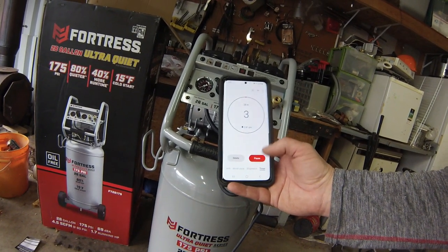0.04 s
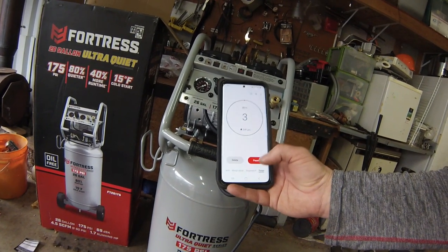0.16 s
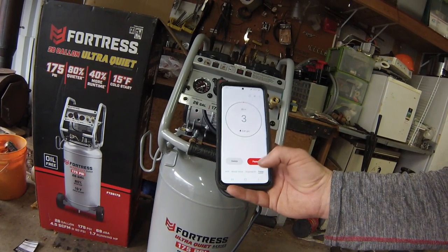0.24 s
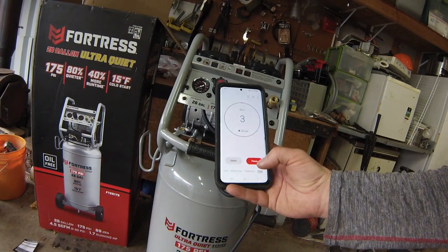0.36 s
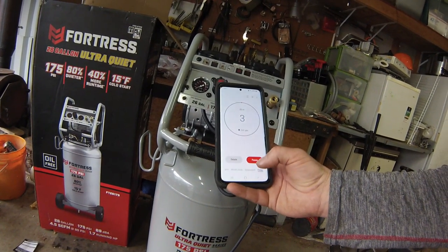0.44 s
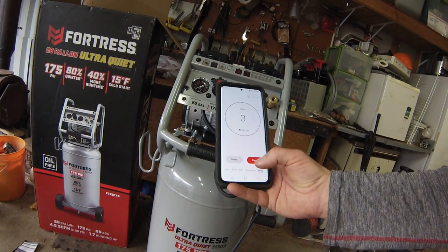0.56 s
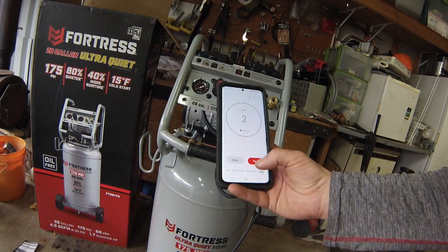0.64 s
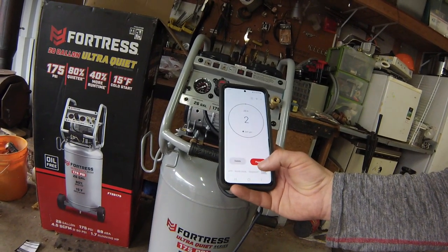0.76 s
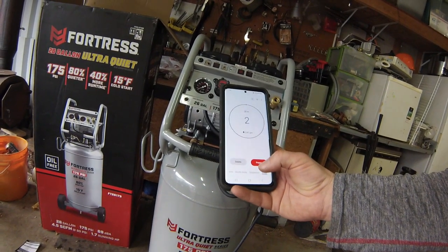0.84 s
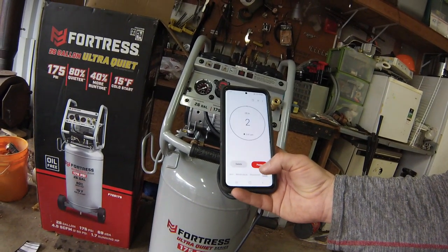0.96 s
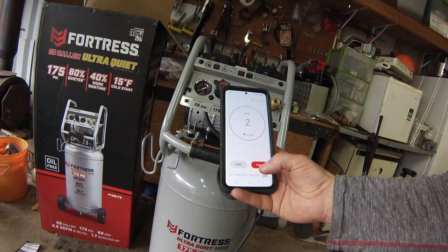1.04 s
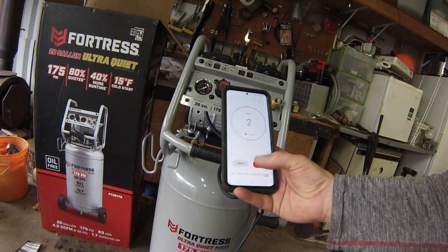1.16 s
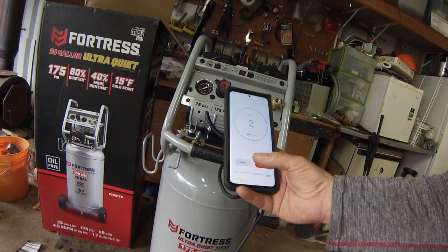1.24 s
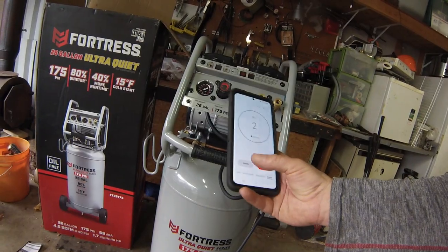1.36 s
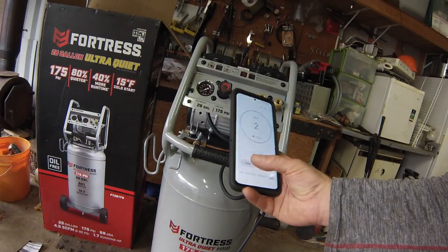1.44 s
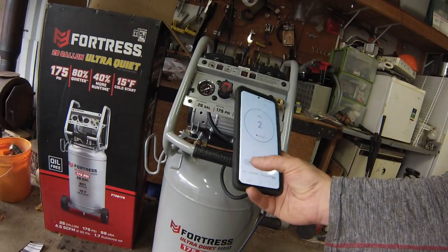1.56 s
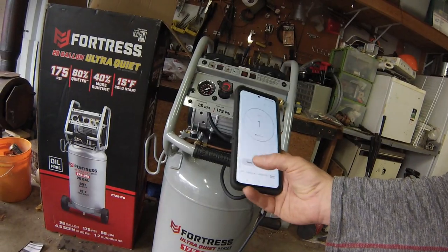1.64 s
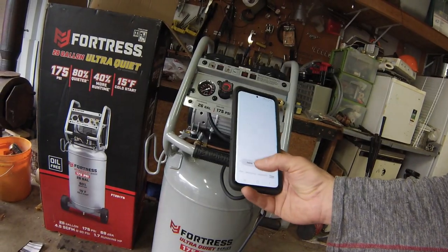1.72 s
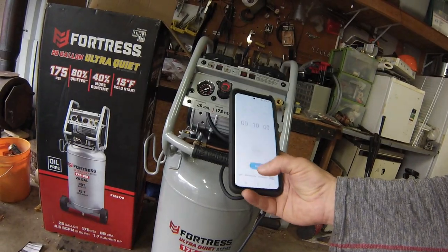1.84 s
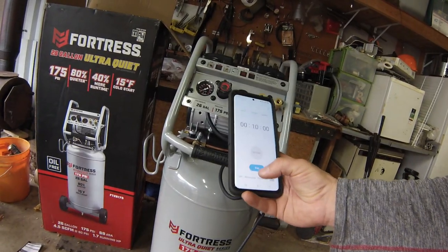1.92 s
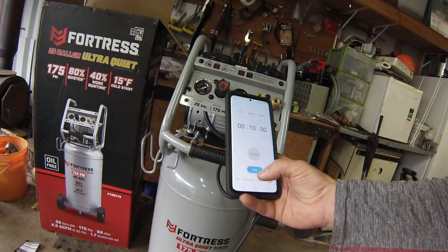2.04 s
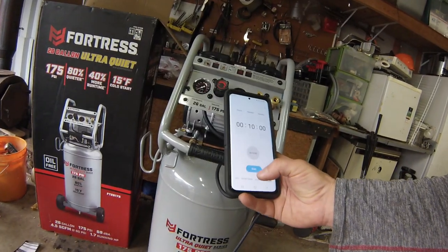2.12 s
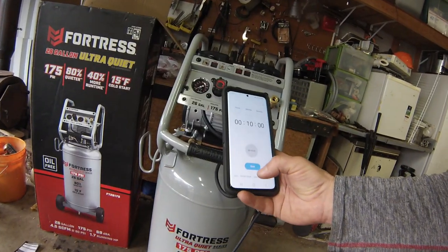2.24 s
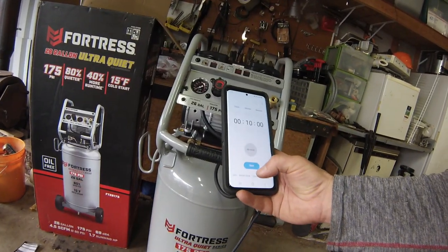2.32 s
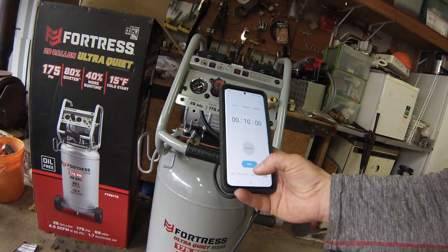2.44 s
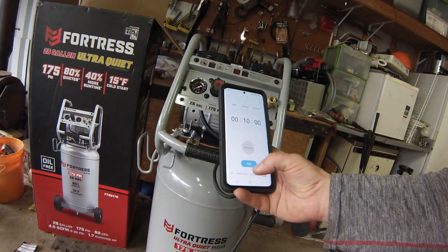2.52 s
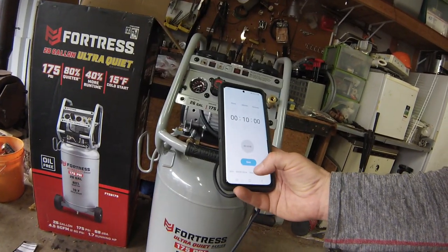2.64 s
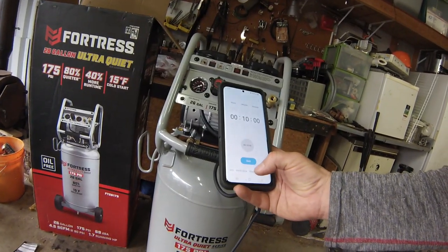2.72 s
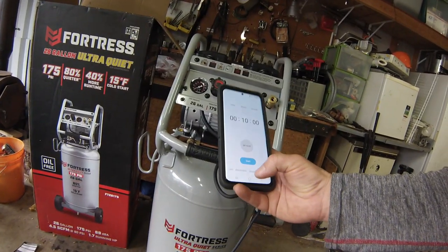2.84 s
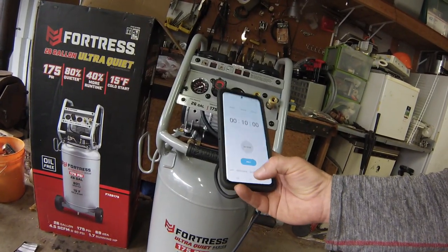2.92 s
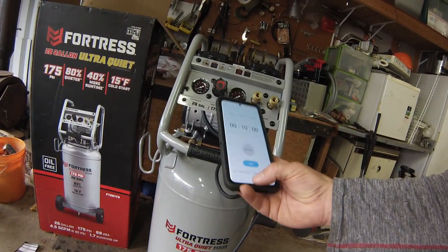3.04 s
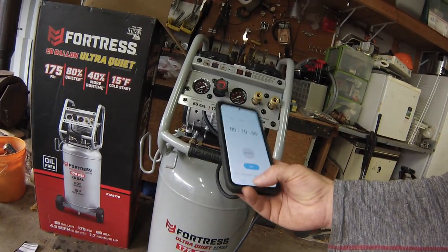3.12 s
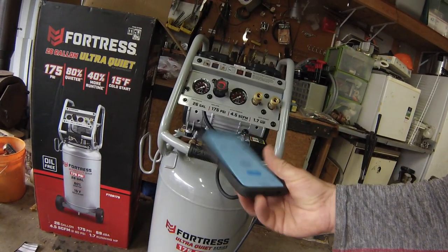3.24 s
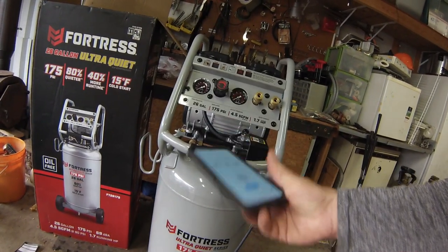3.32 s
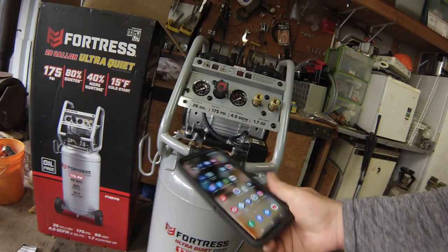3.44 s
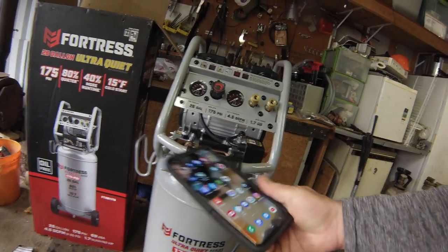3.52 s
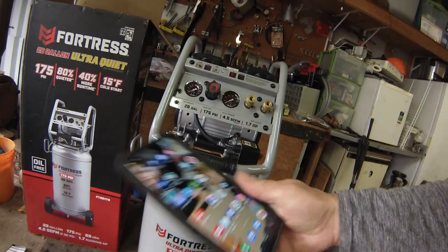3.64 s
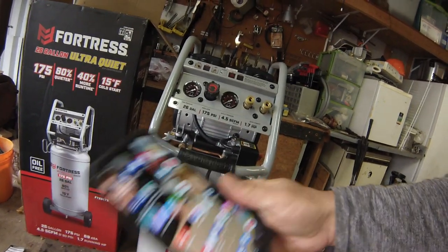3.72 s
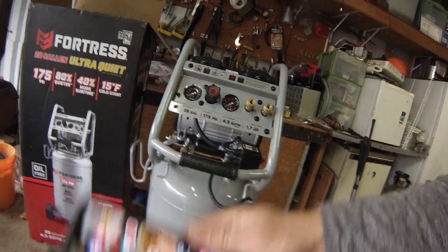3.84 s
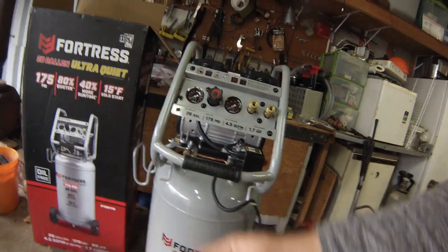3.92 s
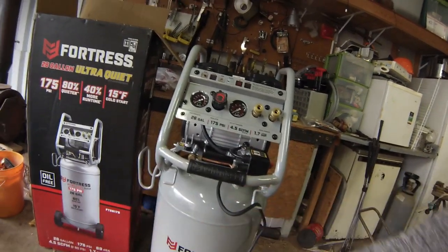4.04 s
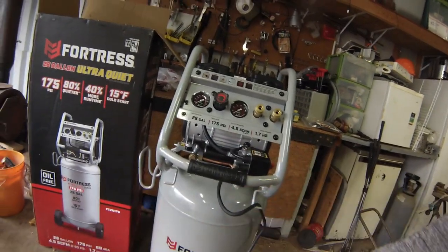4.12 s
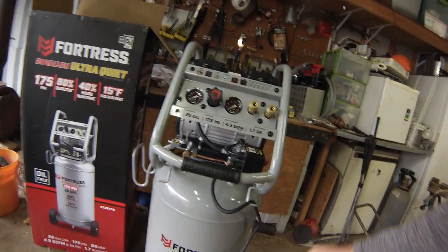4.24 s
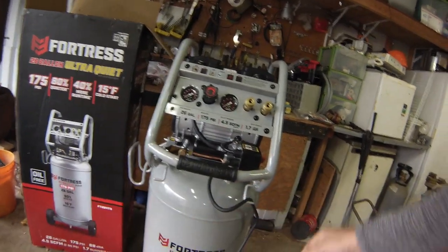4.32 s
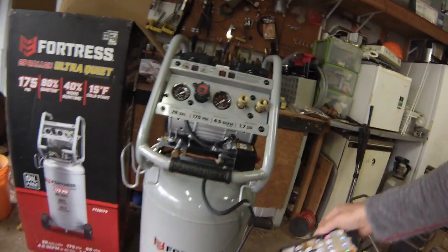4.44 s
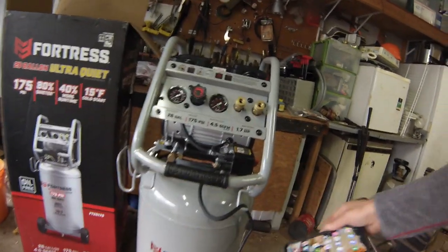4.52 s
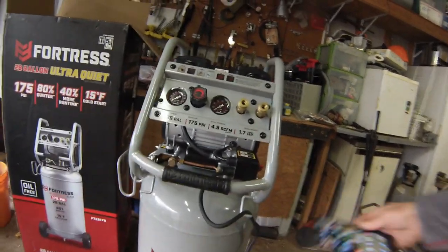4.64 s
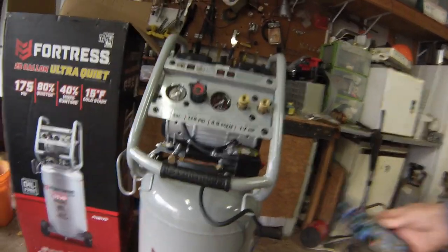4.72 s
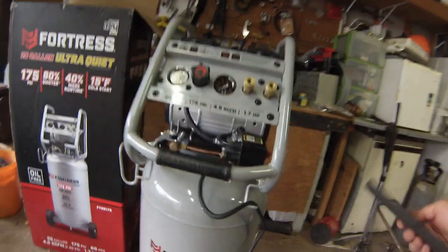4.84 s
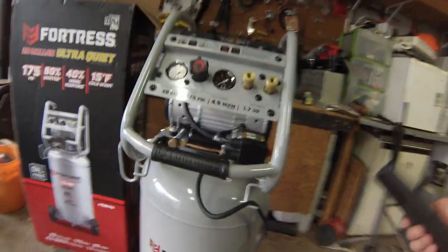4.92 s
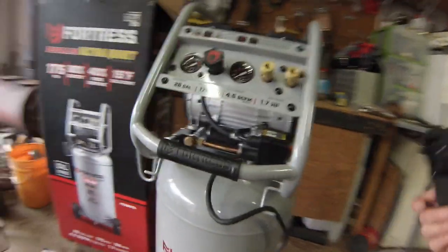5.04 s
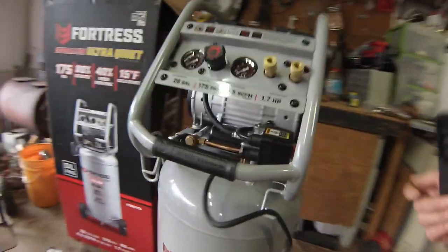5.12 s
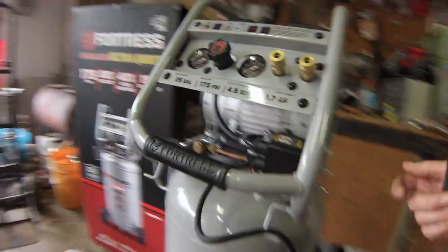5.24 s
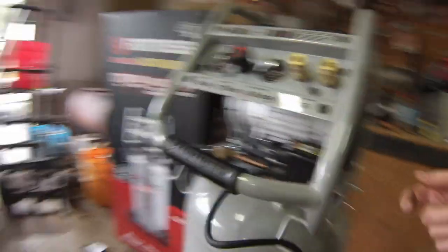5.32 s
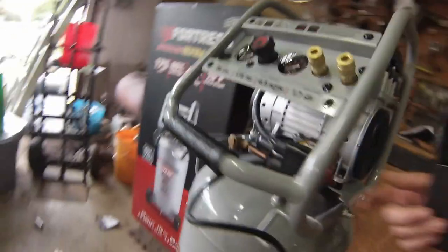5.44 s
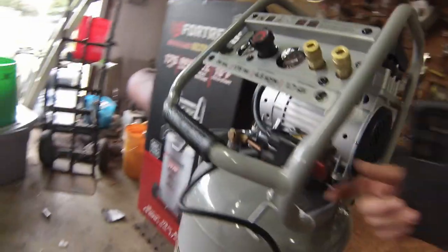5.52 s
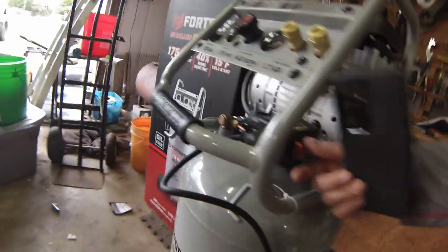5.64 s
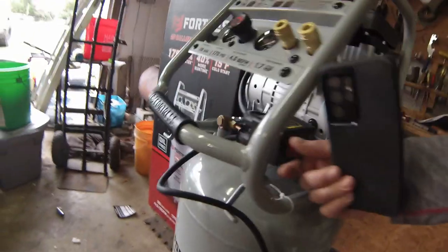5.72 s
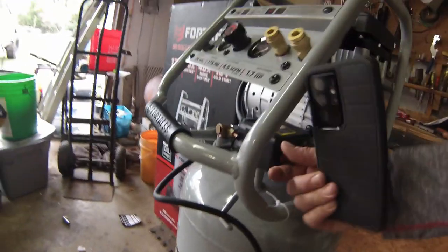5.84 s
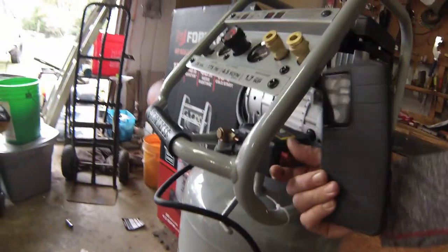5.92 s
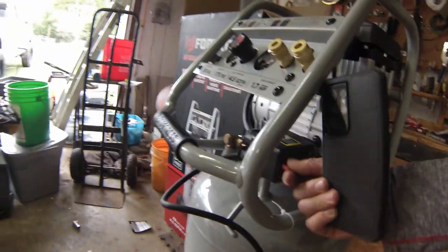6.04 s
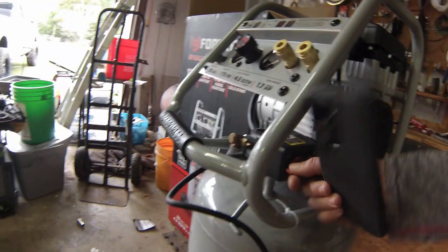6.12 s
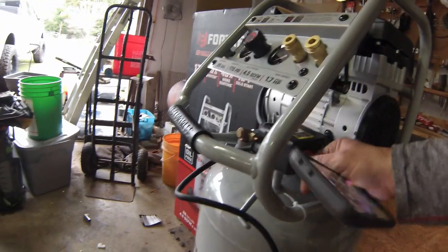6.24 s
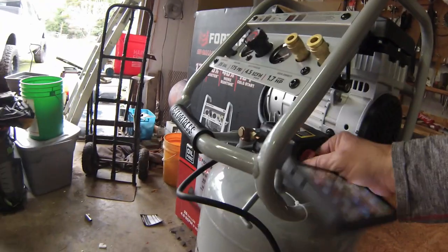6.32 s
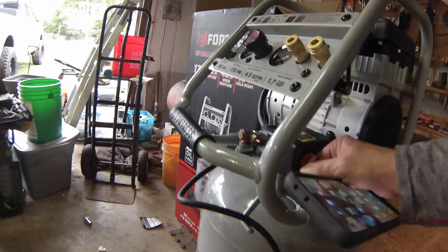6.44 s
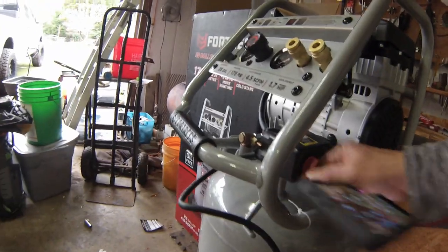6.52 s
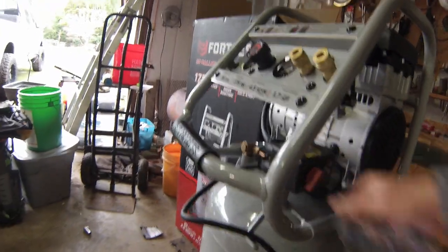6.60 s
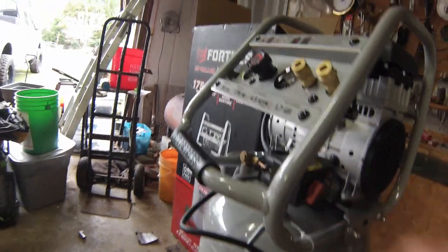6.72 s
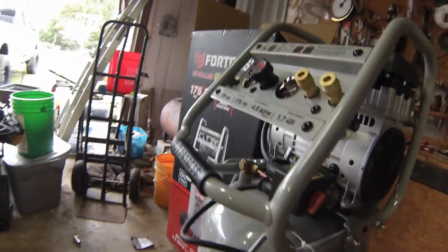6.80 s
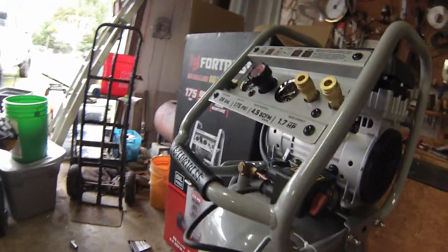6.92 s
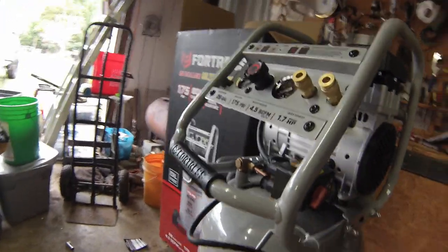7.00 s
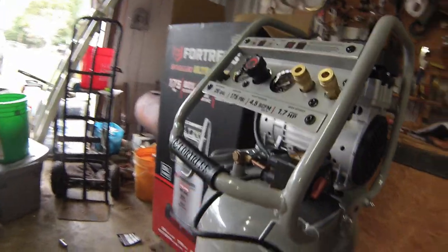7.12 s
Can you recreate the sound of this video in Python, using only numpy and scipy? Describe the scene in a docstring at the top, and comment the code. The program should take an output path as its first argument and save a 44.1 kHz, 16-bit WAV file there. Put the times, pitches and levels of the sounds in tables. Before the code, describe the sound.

In a cluttered garage, a small twin-piston air compressor runs steadily with a hollow mid-pitched roar, fast fluttering throb and airy hiss. The hand-held microphone moves in, bringing out more casing rumble. Near the end air starts to vent, the power cuts, a hard switch snap cracks out, and the pump coasts down in under half a second, leaving soft room hiss.

```python
"""A small twin-piston electric air compressor runs in a garage, close to a hand-held camera that moves in.
The shaft drones, each turn knocks the pump head, and noise shaped by the muffler makes the intake roar.
Trapped air starts to vent just before the power is cut; the pump coasts to rest while the switch snaps.
Drone, knocks and hum are sums of sines; the rushing airs are shaped noise; the switch is struck resonances.
Two soft thuds come through the camera body, and a soft room hiss with two faint tones is left at the end."""
import sys
import numpy as np
from scipy import signal
from scipy.fft import rfft, irfft, next_fast_len
from scipy.io import wavfile
from scipy.ndimage import uniform_filter1d

SR = 44100
rng = np.random.default_rng(int(sys.argv[2]) if len(sys.argv) > 2 else 0)


def wav_out(sig):
    """Save sig, one row per channel (or a flat mono array), as 16-bit PCM at SR to the path in sys.argv[1]."""
    wavfile.write(sys.argv[1], SR, np.round(np.clip(np.atleast_2d(sig).T, -1, 1) * 32767).astype(np.int16))


N = 316195
T = np.arange(N) / SR  # time of each sample, s


def undb(db):
    """Turn decibels into a plain factor."""
    return 10 ** (np.asarray(db) / 20)


def level(x, db):
    """Scale a sound to the given rms level in dB."""
    return x * undb(db) / np.sqrt(np.mean(x ** 2))


def coloured(gain):
    """Noise of rms 1: random noise whose amplitude spectrum is shaped by gain(f/Hz)."""
    size = next_fast_len(N)
    hz = np.arange(1, size // 2 + 2) * SR / size  # starts just above zero, so its logarithm exists
    shaped = rfft(rng.standard_normal(size)) * gain(hz)
    return level(irfft(shaped, size)[:N], 0)


def points(table):
    """Amplitude spectrum drawn through (f/Hz, level/dB) points, with straight lines over log frequency."""
    hz, db = np.transpose(table)
    return lambda f: undb(np.interp(np.log(f), np.log(hz), db))


def resonances(table):
    """Amplitude spectrum of steep resonances whose powers add; each width is where amplitude halves."""
    def gain(f):
        power = 0
        for hz, width, db in table:
            power = power + undb(2 * db) / (1 + ((f - hz ** 2 / f) / width) ** 2) ** 2
        return np.sqrt(power)
    return gain


def ring(x, modes):
    """Resonances struck by x, each dying away by 60 dB in its own time."""
    out = 0
    for hz, db, t60 in modes:
        pole = np.exp(2j * np.pi * hz / SR - np.log(1000) / (t60 * SR))
        out = out + undb(db) * signal.lfilter([1], [1, -pole], x).imag
    return out


def walk(rate):
    """Slow random wander of spread 1: new random values arrive at this rate (Hz) and are smoothed."""
    k = int(SR / rate)
    steps = np.repeat(rng.standard_normal(N // k + 1), k)
    smooth = uniform_filter1d(uniform_filter1d(steps, k), k)[:N]
    return smooth / smooth.std()


WALLS_T60_S, WALLS_DB = .15, -8  # fading time of the tail, and its strength beside the direct sound


def walls(x):
    """Direct sound plus a short diffuse tail from shelves and walls."""
    t = np.arange(int(.3 * SR)) / SR
    tail = rng.standard_normal(len(t)) * np.exp(-np.log(1000) * t / WALLS_T60_S)
    tail *= undb(WALLS_DB) / np.sqrt(np.sum(tail ** 2))
    return (x + signal.fftconvolve(x, tail)[:N]) / np.sqrt(1 + undb(2 * WALLS_DB))


CUT_S, CUT_FADE_S = 6.185, .012  # the power is gone at CUT_S, after a fade of this length
COAST_S = .47  # the shaft then slows evenly to rest in this time


def speed(t):
    """Share of full shaft speed; a tiny floor avoids dividing by zero."""
    return np.clip(1 - (t - CUT_S) / COAST_S, .001, 1)


SHAFT_HZ, FIRST_THROB_S = 29.289, .031  # full shaft rate, and when the first throb peaks
TURNS = SHAFT_HZ * (np.cumsum(speed(T)) / SR - FIRST_THROB_S)  # shaft turns so far
POWERED = np.clip((CUT_S - T) / CUT_FADE_S, 0, 1)  # 1 with power, 0 without
NEAR = np.interp(T, (4.05, 5.42), (0, 1))  # the camera moves in between these times (s)
SIDE = np.interp(T, (5.4, 6.2), (0, 1))  # the camera swings to the side of the pump (s)


# Soft room noise, its spectrum before scaling: (f/Hz, level/dB)
ROOM_SPECTRUM = [(20, -6), (90, -11), (120, -16), (280, -16), (350, -7), (700, -7), (850, 0), (1100, -5),
                 (1500, -11), (1750, -7), (3300, -12), (4800, -5), (6500, -12), (11000, -15), (12000, -21),
                 (15300, -25)]
# Faint steady-pitched tones, rms before they waver: (f/Hz, level/dB)
ROOM_TONES = [(232.5, -57), (1217.5, -57)]
ROOM_DB = -42.5
SETTLE_DB, SETTLE_S = 6, .4  # extra loudness at the power cut, and how slowly it sinks back


def garage():
    """Soft shaped room noise and two wavering sines, louder at the power cut and then sinking back."""
    tones = 0
    for hz, db in ROOM_TONES:
        gain = np.sqrt(2) * undb(db + 2.9 * walk(1.82))
        tones = tones + gain * np.sin(2 * np.pi * (hz * T + rng.random()))
    settle_db = SETTLE_DB * (T > CUT_S) * np.exp(-np.maximum(T - CUT_S, 0) / SETTLE_S)
    room = walls(coloured(points(ROOM_SPECTRUM)))
    room = room * undb(ROOM_DB + .5 * walk(2.11) + settle_db)
    return room + undb(settle_db / 2) * tones


# Soft thuds through the camera body, level of the swell around each: (t/s, level/dB, f/Hz)
BODY_THUDS = [(1.3, -48, 70), (3.62, -40, 45)]


def bumps():
    """Short low thuds: a low sine inside a brief, smooth swell."""
    out = 0
    for s, db, hz in BODY_THUDS:
        swell = np.exp(-((T - s) / .03) ** 2)
        out = out + undb(db) * swell * np.sin(2 * np.pi * hz * (T - s))
    return out


# First touch, snap and rebound, peak of each: (t/s, level/dB)
SWITCH_HITS = [(6.243, -21), (6.3523, -1.5), (6.412, -21)]
# Resonances of the switch housing, strengths beside each other: (f/Hz, level/dB, 60 dB fading time/s)
SWITCH_MODES = [(650, -8, .03), (930, -5, .11), (1150, 0, .022), (1450, -6, .015), (1800, -9, .03),
                (2300, -9, .012), (3500, -9, .014), (5000, -10, .008), (7200, -11, .007), (9200, -12, .008),
                (11200, -14, .005)]
CRACK_DB, CRACK_S = -3, .005  # gain and decay of the broad crack of the contact


def switch():
    """A push and its release ring the housing; loose parts rattle and nearby surfaces scatter it back."""
    out = np.zeros(N)
    t = np.arange(int(.25 * SR)) / SR
    high_pass = signal.butter(2, 350, "high", fs=SR, output="sos")
    crack_band = signal.butter(2, [450, 2300], "band", fs=SR, output="sos")
    for s, db in SWITCH_HITS:
        rattle = undb(-19) * np.exp(-t / .003) + undb(-29) * np.exp(-t / .035)
        blow = rng.standard_normal(len(t)) * rattle
        blow[0], blow[int(.00043 * SR)] = .7, -1.2  # push, then release
        snap = signal.sosfilt(high_pass, ring(blow, SWITCH_MODES))
        crack = signal.sosfilt(crack_band, rng.standard_normal(len(t)))
        crack_fade = np.exp(-t / CRACK_S) + undb(-16) * np.exp(-t / .054)  # quick crack, weaker long tail
        snap = snap / np.abs(snap).max() + undb(CRACK_DB) * crack * crack_fade
        out[int(s * SR):][:len(t)] += snap * undb(db) / np.abs(snap).max()
    return out


# Airy resonances of the low jet, strengths beside each other: (f/Hz, width/Hz, level/dB)
LOW_JET_BANDS = [(3430, 650, 2.5), (4880, 470, -8.5), (6200, 1500, -14)]
# The same for the thin high jet: (f/Hz, width/Hz, level/dB)
HIGH_JET_BANDS = [(8200, 580, 0), (9100, 600, -8)]


def jet(open_s, rise_s, db, until_s, fall_db_per_s):
    """Loudness of one jet: it opens, holds until a set time, then dies away steadily in dB."""
    opening = np.clip((T - open_s) / rise_s, 0, 1)
    return opening * undb(db - fall_db_per_s * np.maximum(T - until_s, 0))


def vent():
    """Trapped air escapes through a small nozzle as shaped noise; the thin high jet lasts longer."""
    low_gain = jet(open_s=6.11, rise_s=.06, db=-38, until_s=6.42, fall_db_per_s=75)
    high_gain = jet(open_s=6.11, rise_s=.06, db=-47, until_s=6.4, fall_db_per_s=19)
    low = low_gain * undb(.87 * walk(40)) * coloured(resonances(LOW_JET_BANDS))  # it flutters
    high = high_gain * coloured(resonances(HIGH_JET_BANDS))
    return walls(low + high)


def strokes(depth_db, lag):
    """Gain that swells twice a turn, once for each piston; lag is in turns."""
    return undb(depth_db * np.cos(4 * np.pi * (TURNS - lag)))


def part_gain(db, near_db, side_db, drop_db, power):
    """Gain of a pump part: dB changes close by, at the side and without power, times speed ** power."""
    total_db = db + NEAR ** 2 * near_db + SIDE * side_db + (1 - POWERED) * drop_db
    return undb(total_db) * speed(T) ** power


# Thin whines of the motor, strengths beside each other: (f/Hz, width/Hz, level/dB)
WHINE_BANDS = [(3397, 10, 0), (3340, 8, -3), (3314, 8, -6), (3760, 15, -8)]


def whine():
    """Narrow bands of noise from the motor that fade out as the camera moves in."""
    return (1 - NEAR) * coloured(resonances(WHINE_BANDS)) * undb(-51)


# Broad rumble of the casing, strengths beside each other: (f/Hz, width/Hz, level/dB)
CASING_BANDS = [(240, 140, -9), (615, 140, -8), (824, 92, 4), (993, 136, 5), (1270, 340, -6),
                (1747, 215, -3.5)]


def casing():
    """Broad bands of rumbling noise from the casing that grow as the camera moves in."""
    return NEAR * coloured(resonances(CASING_BANDS)) * undb(-26)


# Spectrum of the pump's hiss from further off, before scaling: (f/Hz, level/dB)
HISS_FAR = [(1470, -31), (2500, -3), (2620, 5), (2740, -1.5), (3440, 5), (3970, -9.5), (5060, -2),
            (5670, -26), (6490, -5), (7110, -41), (7560, -4), (8790, 2.5), (9930, -3.5), (11000, -4),
            (15300, -25)]
# The same from close by: (f/Hz, level/dB)
HISS_CLOSE = [(1470, -36), (2500, -1.5), (2740, -6.5), (3040, 2.5), (4450, -4.5), (4940, -1), (5980, -9.5),
              (7390, -8.5), (8930, -2), (11000, -6.5), (15300, -24)]


def hiss():
    """Air noise pulsing with each piston stroke; its colour changes as the camera moves in."""
    far, close = coloured(points(HISS_FAR)), coloured(points(HISS_CLOSE))
    air = np.sqrt(1 - NEAR) * far + np.sqrt(NEAR) * close
    gain = part_gain(db=-39.5, near_db=2, side_db=-.3, drop_db=-2.5, power=.55)
    return walls(air * strokes(1, lag=.26) * gain * undb(.14 * walk(12)))


# Upper ringing of the pump, strengths beside each other: (f/Hz, width/Hz, level/dB)
UPPER_BANDS = [(1640, 50, 0), (1640, 16, 0), (1217, 8, -3), (1289, 30, -12), (1490, 30, -9), (1543, 20, -9),
               (1955, 55, -8), (1761, 30, -11), (1844, 30, -12), (1650, 900, -16), (2120, 200, -16)]


def upper_ring():
    """Noise in ringing bands that pulses with each piston stroke and wavers at random."""
    gain = part_gain(db=-31, near_db=-1, side_db=-4.5, drop_db=-6.5, power=.5)
    return coloured(resonances(UPPER_BANDS)) * strokes(1, lag=.3) * gain * undb(.69 * walk(3.92))


# Hum lines, rms before the camera moves:
# (multiple of twice the mains rate, added multiple of the shaft rate, level/dB)
HUM_LINES = [(1, 0, -44), (1, -1, -65), (1, 1, -61), (1, 2, -51), (1, 3, -57), (2, -1, -62), (2, 0, -51),
             (2, 1, -54), (2, 3, -59), (2, 4, -59), (3, 0, -57)]
TWICE_MAINS_HZ = 119.97


def hum(pure_db, loaded_db):
    """Magnetic hum of the motor: a pure tone, and lines modulated by the load on the shaft."""
    out = 0
    for m, k, db in HUM_LINES:
        change_db = pure_db if (m, k) == (1, 0) else loaded_db
        cycles = m * TWICE_MAINS_HZ * T + k * TURNS + rng.random()
        out = out + np.sqrt(2) * undb(db + change_db) * np.sin(2 * np.pi * cycles)
    return out


# Last piston strokes, level of the swell at its top: (t/s, level/dB)
COASTING_STROKES = [(6.18, -22), (6.201, -25), (6.227, -21.5), (6.255, -27), (6.286, -22), (6.336, -24),
                    (6.391, -30), (6.452, -35), (6.482, -25.5)]
STROKE_HZ, STROKE_RISE_HZ_PER_S = 426.5, 112  # pitch at the power cut, and its rise after it
STROKE_DECAY_S, SLOW_POWER = .0062, 1.6  # decay at full speed; slower strokes last longer


def last_strokes():
    """Separate soft throbs of the head around the power cut and as the shaft slows."""
    out = 0
    for s, db in COASTING_STROKES:
        t = np.clip(T - s, -.1, .3)
        hz = STROKE_HZ + STROKE_RISE_HZ_PER_S * (s - CUT_S)
        decay_s = STROKE_DECAY_S / speed(s) ** SLOW_POWER
        swell = np.where(t < 0, np.exp(-(t / .0092) ** 2), np.exp(-t / decay_s))
        out = out + undb(db) * swell * np.sin(2 * np.pi * hz * (T - s))
    return out


# Muffler resonances under power, strengths beside each other: (f/Hz, width/Hz, level/dB)
MUFFLER_BANDS = [(879.8, 43, -1.5), (906.8, 29.7, -0.5), (852.3, 23, -4), (943, 36, -7.5), (980, 30, -13.5),
                 (1004, 42, -11.5), (1064.3, 18.7, -12.5), (801, 39, -10.5), (794, 60, -17.5),
                 (750, 73, -14), (680, 7.9, -17.5), (631, 28, -23), (568, 14.5, -20), (1097, 13, -23.5),
                 (854, 520, -24.5), (415, 260, -32), (200, 110, -35), (50, 80, -46)]
# Intake once the pump is unloaded, strengths beside each other: (f/Hz, width/Hz, level/dB)
IDLE_BANDS = [(954, 49, 0), (865, 580, -13), (248, 720, -20)]


def roar():
    """Intake air roars in the muffler, swelling per stroke; it dips briefly while the camera moves."""
    loaded, idle = coloured(resonances(MUFFLER_BANDS)), coloured(resonances(IDLE_BANDS))
    intake = POWERED * loaded + (1 - POWERED) * idle
    gain = part_gain(db=-17.5, near_db=-.54, side_db=-1, drop_db=-8, power=1.26)
    dip_db = -2.6 * np.exp(-((T - 4.9) / .2) ** 2)
    return intake * strokes(.6, lag=-.03) * gain * undb(dip_db)


# Shaft drone, rms before the part gain: (multiple of the shaft rate, level/dB)
DRONE_LINES = [(1, -51), (2, -44), (3, -64), (4, -62), (6, -51), (8, -61), (9, -65), (10, -54)]


def drone():
    """Low multiples of the shaft rate, each wandering a little in level."""
    out = 0
    for k, db in DRONE_LINES:
        gain = np.sqrt(2) * undb(db + .45 * walk(2.7))
        out = out + gain * np.sin(2 * np.pi * (k * TURNS + rng.random()))
    return out * part_gain(db=-.1, near_db=4.3, side_db=.3, drop_db=-12, power=1.6)


# Shaft multiples lifted by the head resonance, rms before the camera moves:
# (multiple of the shaft rate, level/dB, added when close by/dB)
HEAD_LINES = [(12, -56, 0), (13, -41, 0), (14, -34, 1), (15, -39, -1), (16, -38, -4), (17, -42, -5),
              (18, -51, -2), (20, -58, 0)]
THROB_SPREAD = .06  # outer multiples lead by this share of a cycle times their distance squared


def knocks():
    """Multiples of the shaft rate that peak nearly together, so the pump head throbs once a turn."""
    centre = 15
    out = 0
    for k, db, near_db in HEAD_LINES:
        gain = np.sqrt(2) * undb(db + NEAR * near_db + .5 * walk(9.7))
        out = out + gain * np.cos(2 * np.pi * (k * TURNS + THROB_SPREAD * (k - centre) ** 2))
    return out


def compressor():
    """All parts of the pump on one shaft; whine, casing, hum and knocks stop with the power."""
    knock_db = NEAR ** 2 * 3 + SIDE * 1.2
    hum_db = SIDE * -9
    driven = whine() + casing() + hum(hum_db, knock_db) + knocks() * undb(knock_db)
    return hiss() + upper_ring() + roar() + drone() + POWERED * driven + last_strokes()


def scene():
    """Everything heard together, as one channel."""
    return (garage() + bumps() + switch() + vent() + compressor())[None]


NOTCH_HZ, NOTCH_WIDTH_HZ, NOTCH_DEPTH = 2564, 485, .78  # depth is the share removed at the centre
TOP_HZ = 15250


def record(dry):
    """The microphone housing dips near one frequency; the recorder cuts the top."""
    dip = signal.lfilter(*signal.iirpeak(NOTCH_HZ, NOTCH_HZ / NOTCH_WIDTH_HZ, fs=SR), dry)
    top_cut = signal.ellip(10, .2, 80, TOP_HZ, fs=SR, output="sos")
    return signal.sosfilt(top_cut, dry - NOTCH_DEPTH * dip)


dry = scene()
out = record(dry)
wav_out(out)
```